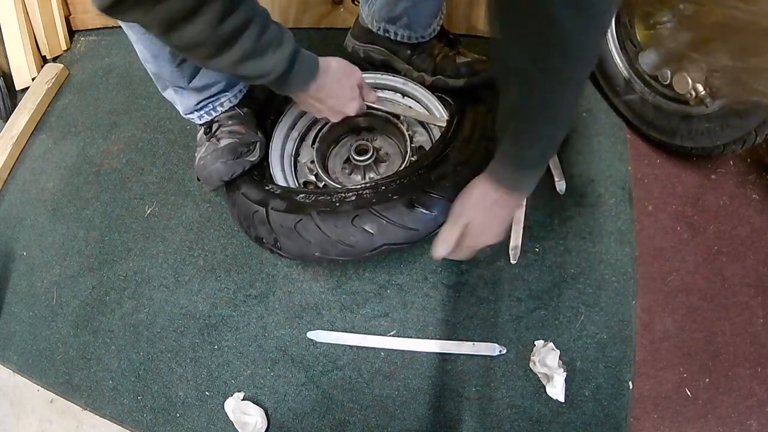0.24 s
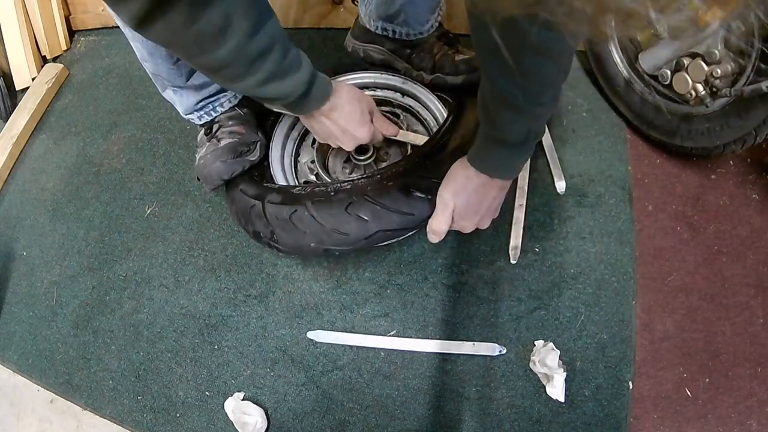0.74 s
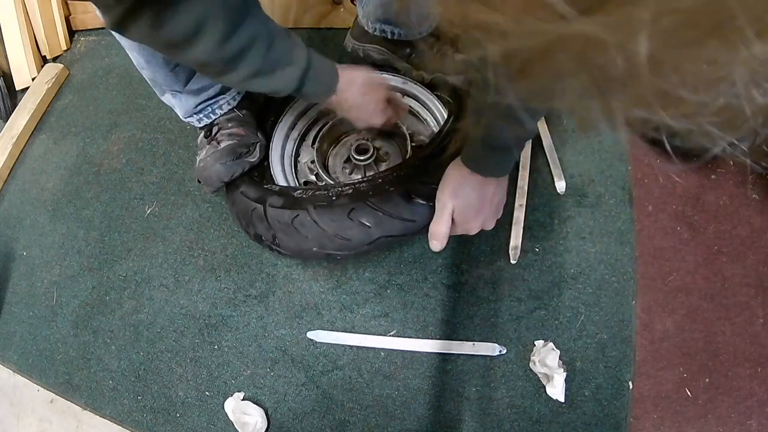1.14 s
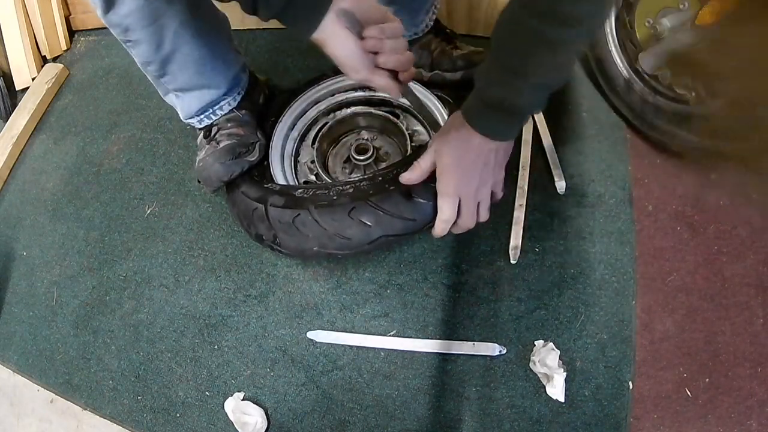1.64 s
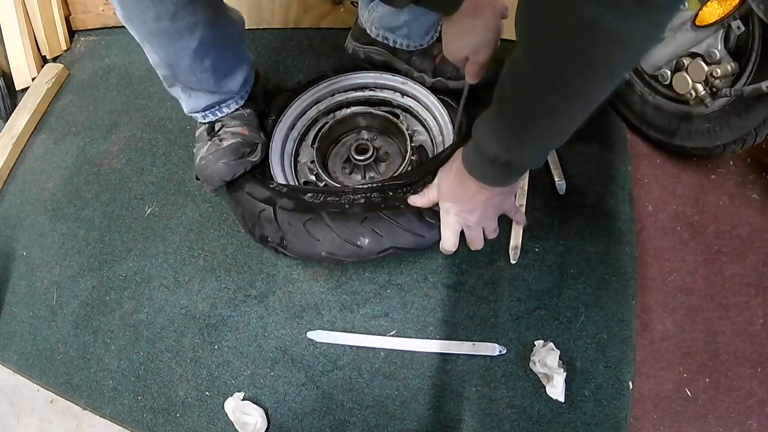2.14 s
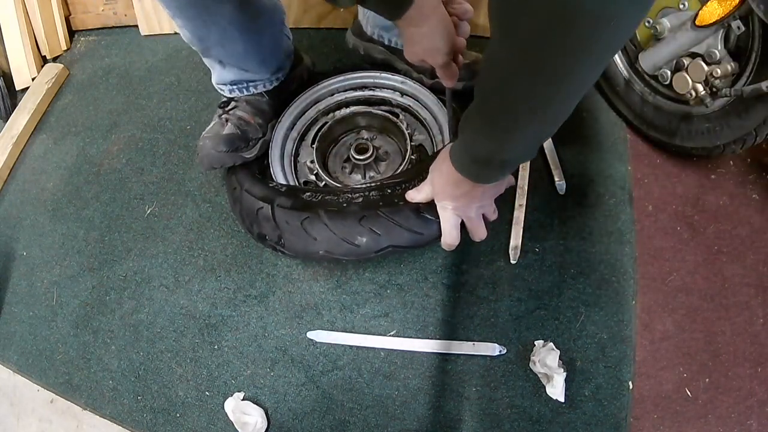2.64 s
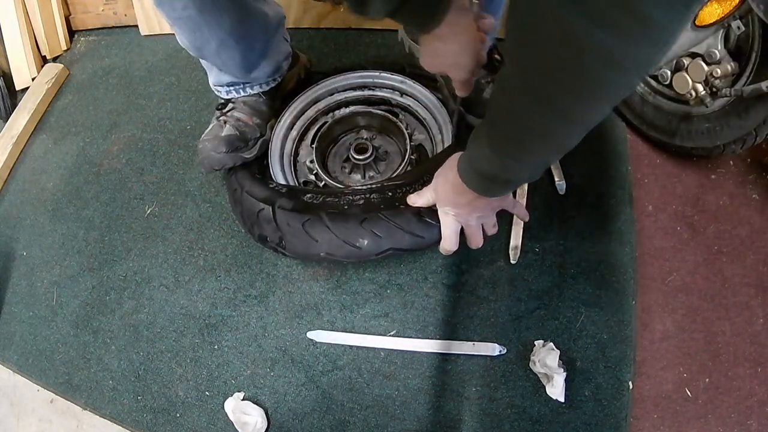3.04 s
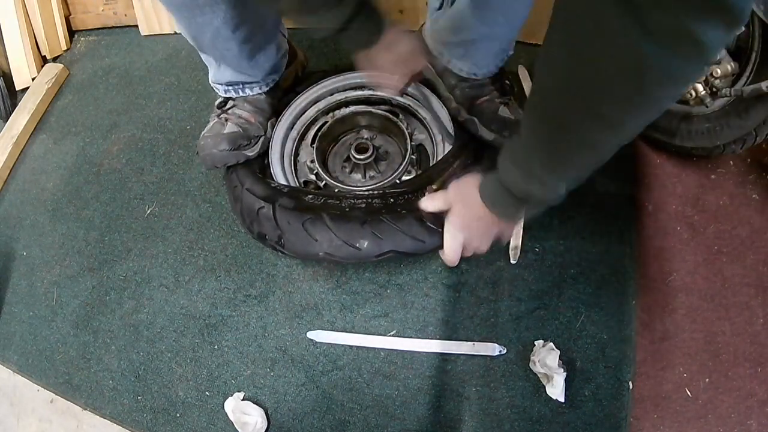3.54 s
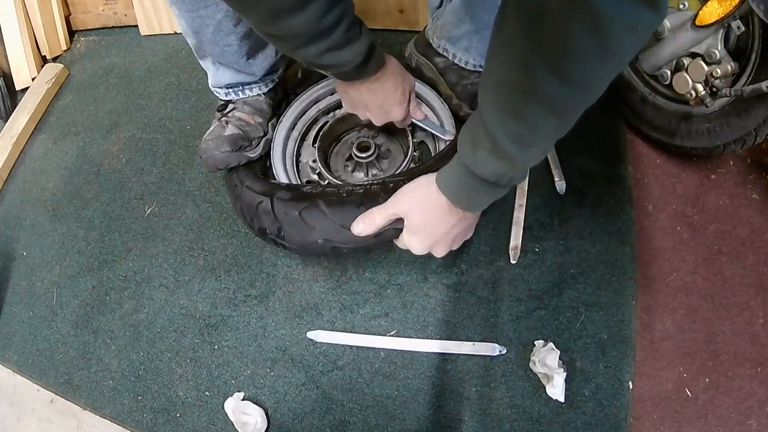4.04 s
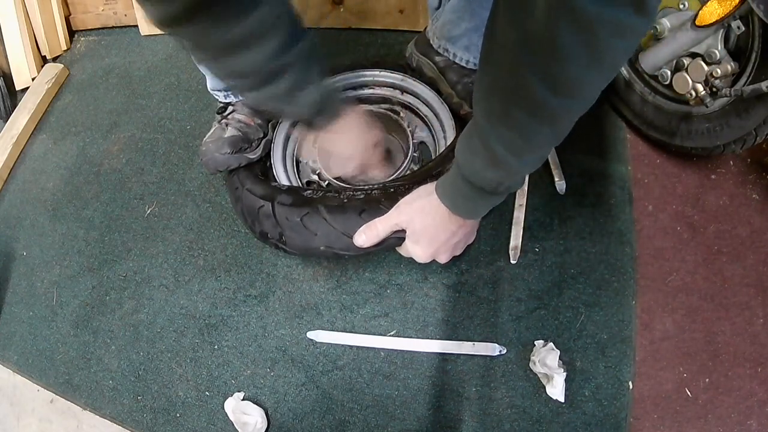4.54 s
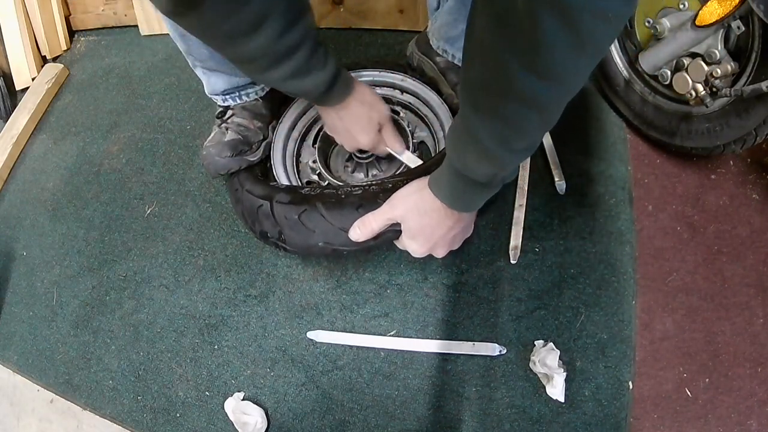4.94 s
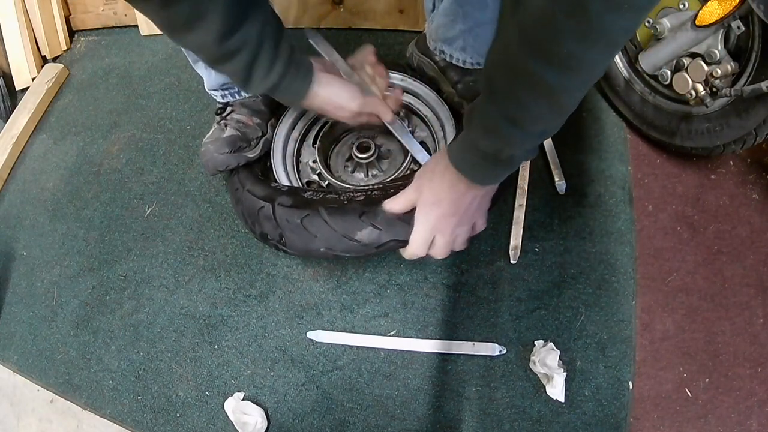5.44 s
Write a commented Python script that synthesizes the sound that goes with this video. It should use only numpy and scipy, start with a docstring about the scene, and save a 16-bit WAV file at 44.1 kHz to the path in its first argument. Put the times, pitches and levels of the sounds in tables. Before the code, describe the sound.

In a small carpeted room, close to a camera microphone, one tire iron drops against another with a bright ring, then a hard clank hits the wheel rim. Softer knocks, rubber thuds and gritty scrapes follow, with a short creak midway. A loud double clank comes late, then a few lighter taps, all over steady hiss.

```python
"""Over steady hiss a faint scrape and two small knocks come first, then one tyre iron is laid against another.
Both irons ring; knocks on a steel wheel, tyre thuds, scrapes and one creak of rubber follow, in a small
carpeted room, close to a camera microphone. Irons, rim and bead are sums of dying sines, thuds are damped
tones, knocks and scrapes are shaped noise; a sparse random echo tail makes the room."""
import sys
import numpy as np
from scipy import signal
from scipy.fft import rfft, irfft
from scipy.io import wavfile
from scipy.ndimage import uniform_filter1d

SR = 44100
rng = np.random.default_rng(int(sys.argv[2]) if len(sys.argv) > 2 else 0)


def transcribe(u):
    """Save the signal u as a 16-bit wav file named by the first command-line argument.

    u: samples, shape (n,) or (channels, n), limited to [-1, 1]; the rate is SR.
    q: integer samples, one column per channel.
    """
    v = np.clip(np.atleast_2d(u).T, -1, 1)
    q = np.round(v * 32767).astype(np.int16)
    wavfile.write(sys.argv[1], SR, q)


N = 250929  # length in samples

# modes of the steel rim held by the tyre, close pairs warble: f/Hz, level/dB, t60/s
RIM_MODES = [(1424, 5, .055), (1462, -1, .05), (1885, -14, .04), (2120, -16, .05), (2310, -8, .11),
             (2485, -10, .08), (2700, -15, .07), (2860, -16, .08), (3480, -5, .035), (3770, -10, .05),
             (4600, -7, .03), (4850, -11, .03)]
# colour of the damped crunch of iron on rim and rubber: f/Hz, relative level/dB
CRUNCH_COLOUR = [(250, -32.5), (700, -6.5), (1100, -6), (1430, -6.5), (1800, -3.5), (2200, -2.5),
                 (2900, -5.5), (3500, -5.5), (4100, -6.5), (4700, -10), (5600, -22.5), (8000, -24.5),
                 (12000, -33)]
# rubber bead slipping on the rim: t/s, slip rate f/Hz, level/dB
BEAD_SLIPS = [(3.09, 264, -21), (3.11, 254, -26.5), (3.125, 240, -21.5), (3.137, 200, -25),
              (3.144, 275, -29.5)]


def gain_of(db):
    """Decibels to gain."""
    return 10 ** (np.asarray(db) / 20)


def evened(x):
    """Scales to rms 1."""
    return x / np.sqrt(np.mean(x ** 2) + 1e-20)


def read(points, hz):
    """Reads a spectrum table on a log-frequency axis."""
    f, value = np.transpose(points)
    return np.interp(np.log(hz + 1), np.log(f + 1), value)


def add(mix, s, sound):
    """Mixes a sound in at a time in seconds."""
    part = mix[round(s * SR):][:len(sound)]
    part += sound[:len(part)]


def high_pass(x, order, hz):
    """Takes away the bass below hz."""
    return signal.sosfilt(signal.butter(order, hz, "high", fs=SR, output="sos"), x)


def shaped(x, points):
    """Gives noise the colour of a spectrum table, rms 1."""
    hz = np.fft.rfftfreq(len(x), 1 / SR)
    return evened(irfft(rfft(x) * gain_of(read(points, hz)), len(x)))


def ring(modes, seconds, tilt_db=0, spread_db=0, rise_ms=0.15):
    """One blow on a body: dying sines, tilted about 2 kHz, each excited more or less by where the blow lands."""
    hz, db, t60 = np.transpose(modes)[:, :, None]
    t = np.arange(round(seconds * SR)) / SR
    db = db + tilt_db * np.log2(hz / 2000) + spread_db * rng.standard_normal(hz.shape)
    sound = (gain_of(db - 60 * t / t60) * np.sin(2 * np.pi * hz * t)).sum(0)
    rise = np.sin(np.pi / 2 * np.minimum(1000 * t / rise_ms, 1)) ** 2
    return sound * rise


def resonate(x, hz, width_hz):
    """A resonance of gain 1 at its centre: shifts hz down to zero, smooths, and shifts back."""
    turn = np.exp(2j * np.pi * np.cumsum(hz * np.ones(len(x))) / SR)
    r = np.exp(-np.pi * width_hz / SR)
    return 2 * (turn * signal.lfilter([1 - r], [1, -r], x / turn)).real


def hiss():
    """Steady background hiss: coloured noise at a constant level."""
    # spectrum of the hiss: f/Hz, relative level/dB
    hiss_colour = [(15, -32), (25, -11), (59, -12.5), (78, -4.5), (173, -5.5), (322, -7.5), (474, -2),
                   (540, -7.5), (859, -5.5), (928, -3.5), (1480, -4), (12000, -11.5), (15500, -41),
                   (22000, -120)]
    return gain_of(-58) * shaped(rng.standard_normal(N), hiss_colour)


def shuffle():
    """Sleeves, shoes and rubber rustle faintly in small clumps: noise with an uneven level."""
    # faint handling between the blows: t/s, level/dB
    handling = [(0.0, -59.5), (0.43, -57), (0.65, -60.5), (0.86, -63), (3.45, -60.5), (4.23, -65),
                (5.69, -56.5)]
    # spectrum of the rustle: f/Hz, relative level/dB
    rustle_colour = [(60, -25), (200, -7.5), (500, -3.5), (1500, -6.5), (4000, -9), (12000, -23)]
    s, level_db = np.transpose(handling)
    clumps = evened(uniform_filter1d(uniform_filter1d(rng.standard_normal(N), 500), 500))
    level_db = np.interp(np.arange(N) / SR, s, level_db) + 1.8 * clumps
    return gain_of(level_db) * shaped(rng.standard_normal(N), rustle_colour)


def room(x):
    """Sparse taps of random sign, one in every 20 samples, each band dying at its own speed."""
    # decay of the room: f/Hz, t60/s
    decay = [(300, 0.59), (800, 0.2), (3000, 0.2), (10000, 0.17)]
    taps = np.zeros(SR // 2)
    at = np.arange(300, len(taps) - 20, 20)
    taps[at + rng.integers(0, 20, len(at))] = rng.choice([-1., 1.], len(at))
    hz, t, bands = signal.stft(taps, SR, nperseg=256)
    bands = bands * gain_of(-60 * t / read(decay, hz)[:, None])
    tail = signal.istft(bands, SR, nperseg=256)[1]
    return signal.fftconvolve(x, tail / np.linalg.norm(tail))[:N]


def creak():
    """Stick and slip: a quick train of slips that slows, then quickens at the very end; each rings the bead."""
    # what each slip rings: f/Hz, level/dB, t60/s
    bead_modes = [(740, 5, 0.0053), (1350, -8, 0.0065), (3230, 9.5, 0.005), (3620, -9, 0.0047),
                  (4510, -2, 0.0062), (6750, -19, 0.0069)]
    s, rate, level_db = np.transpose(BEAD_SLIPS)
    t = np.arange(s[0], s[-1], 1 / SR)
    # a slip falls wherever the running count passes a whole number
    slips = np.diff(np.floor(np.cumsum(np.interp(t, s, rate)) / SR), prepend=0)
    slips *= gain_of(np.interp(t, s, level_db) + rng.standard_normal(len(t)))
    return signal.fftconvolve(slips, ring(bead_modes, .03, rise_ms=1.0))  # rubber lets go gradually


def scrape(seconds, level_db, hz, width_hz, body_db):
    """Gritty friction passes a bright resonance, the crunch and modes of the rim and the low body of the tyre."""
    size = round(seconds * SR)
    roughness = evened(uniform_filter1d(rng.standard_normal(size), 90))
    grit = rng.standard_normal(size) * gain_of(3.5 * roughness)
    bright = evened(resonate(resonate(grit, hz, width_hz), hz, 2 * width_hz))
    bright += width_hz / 3500 * shaped(grit, CRUNCH_COLOUR)  # broad scrapes crunch more
    bright += 0.087 * evened(signal.fftconvolve(grit, ring(RIM_MODES, 0.013, tilt_db=-9.5)))[:size]
    low = evened(resonate(resonate(grit, 1200, 1600), 1100, 1810))
    u = np.linspace(0, 1, size)
    stroke = np.sin(np.pi * u ** 0.6) ** 2  # swells sooner than it fades
    return gain_of(level_db) * (evened(bright) + gain_of(body_db) * low) * stroke


def thud(level_db, hz, fall_ms):
    """The tyre's rubber answers with a few cycles of a low damped tone."""
    ms = 1000 * np.arange(SR // 10) / SR
    cycles = ms * hz / 1000
    envelope = np.exp(-ms / max(fall_ms, .5)) * np.minimum(cycles * 3, 1)
    return gain_of(level_db) * np.sin(2 * np.pi * cycles) * envelope


def irons():
    """Three quick contacts ring both bars, the later two starting more gradually; the carpet then stills one bar."""
    # contacts of iron on iron: t/s, level/dB, brightness/(dB per octave), rise/ms
    clinks = [(0.107, -11, 0.2, 0.45), (0.116, -9.5, 2, 3.7), (.125, -3.5, 1.5, 3.4)]
    # modes of the iron that is put down: f/Hz
    laid_hz = [1001, 1357, 1916, 3182, 3580, 4511, 4619, 4694, 4770, 6019, 6060, 6352, 6476, 8317, 8506,
               9205, 9238, 10790, 11900, 1040, 1310, 1865, 1965]
    # how those modes ring: level/dB, t60/s
    laid_ring = [(-38, 8.3), (-42.5, 0.92), (-26.5, 0.25), (-12.5, 0.54), (-23.5, 0.42), (-34, 0.085),
                 (-14.5, 0.3), (-6, 0.27), (-27, 0.095), (-32, 0.527), (-36.5, 0.47), (-22, 0.25),
                 (-6.5, 0.17), (-15, 0.13), (-32, 0.57), (-21, 0.27), (-30, 0.21), (-34, 0.28),
                 (-39, 0.057), (-31.5, 0.29), (-32, 0.13), (-40.5, 0.111), (-47, 1.4)]
    # modes of the iron that is struck and rings on freely: f/Hz
    free_hz = [3004, 3639, 6831, 9835]
    # how those modes ring: level/dB, t60/s
    free_ring = [(-37, 1.4), (-43.5, 3.2), (-40, 1.1), (-40.5, 1.58)]
    settles_s, settled_t60_s = 0.368, 0.19  # the laid iron meets the carpet, and the extra decay from then
    t, bars = np.arange(N) / SR, np.zeros(N)
    settled = gain_of(-60 * np.maximum(t - settles_s, 0) / settled_t60_s)
    # the ring of the laid bar flutters unevenly
    flutter = evened(resonate(rng.standard_normal(N), 36, 21))
    low_pass = signal.butter(4, 2400, fs=SR, output="sos")
    next_contacts = [row[0] for row in clinks[1:]] + [t[-1]]
    for (s, db, tilt_db, rise_ms), until in zip(clinks, next_contacts):
        laid, free = np.zeros(N), np.zeros(N)
        add(laid, s, ring(np.c_[laid_hz, laid_ring], .6, tilt_db, rise_ms=rise_ms))
        add(free, s, ring(np.c_[free_hz, free_ring], 2.2, tilt_db, rise_ms=rise_ms))
        low = signal.sosfiltfilt(low_pass, laid)
        laid = (laid - low) * gain_of(1.1 * flutter) + low * gain_of(2.0 * flutter)
        handover = np.clip(1 - (t - until) / 0.0045, 0, 1)  # each contact takes over from the last
        bars += gain_of(db) * (laid * settled + free) * handover
    grind = rng.standard_normal(3000) * np.exp(-np.arange(3000) / 450)  # the bars grate as they meet
    add(bars, clinks[0][0], gain_of(-26.5) * resonate(grind, 5900, 7400))
    return high_pass(bars, 2, 900)  # thin bars radiate no bass


def knock(level_db, hard_db, ring_db):
    """A few ms of chattering contact between iron and rim crunch and ring the rim."""
    size = 8192
    chatter_ms = max(3.68 - 0.1 * hard_db, .5)  # softer blows chatter longer
    u = 1000 * np.arange(size) / SR / chatter_ms
    contact = rng.standard_normal(size) * (1 - np.exp(-2.5 * u)) * np.exp(-u)
    hz = np.fft.rfftfreq(size, 1 / SR)
    # soft blows lose treble all the way up, hard ones gain it only to 5 kHz
    octaves = np.log2((hz if hard_db < 0 else np.minimum(hz, 5000)) / 2000 + 0.041)
    colour = gain_of(read(CRUNCH_COLOUR, hz) + hard_db * octaves)
    crunch = irfft(rfft(contact) * colour, size)
    rim = ring(RIM_MODES, size / SR, hard_db, spread_db=1.0, rise_ms=1.02 * chatter_ms)
    blow = evened(crunch) + gain_of(ring_db) * evened(rim)
    fade = np.cos(np.linspace(0, np.pi / 2, size)) ** 2
    fade *= np.minimum(np.arange(size) / 16, 1)  # no click at the start
    return gain_of(level_db) * blow / abs(blow).max() * fade


def scene():
    """Scrapes, thuds, knocks, irons and creak near the microphone, with room tail, rustle and hiss."""
    # rubbing of iron, hand and rubber:
    # t/s, length/s, level/dB, centre f/Hz, width f/Hz, low body against the bright part level/dB
    scrapes = [(0.008, 0.064, -52, 2210, 1500, 2.5), (1.471, 0.15, -46, 3540, 1130, -14),
               (1.587, 0.33, -53.5, 4110, 804, -30), (1.71, 0.042, -47.5, 3970, 1200, -5.5),
               (1.745, 0.075, -51, 4330, 550, -29.5), (2.191, 0.052, -32, 2980, 1580, -10.5),
               (2.225, 0.11, -48, 2780, 1500, -2.5), (2.346, 0.048, -51.5, 3230, 1300, 1),
               (3.063, 0.17, -51.5, 3180, 1300, 6.5), (3.198, 0.066, -53, 2570, 1500, 8.5),
               (3.388, 0.13, -62, 2230, 1300, 10.5), (3.454, 0.18, -71.5, 2200, 1300, 12.5),
               (4.494, 0.13, -37, 3100, 2030, 2), (4.572, 0.19, -49, 2600, 2200, -5)]
    # the tyre thuds: t/s, level/dB, f/Hz, time to fall to about a third/ms
    thuds = [(0.4240, -31.5, 206, 11.3), (0.4297, -22.5, 472, 6.7), (0.4682, -36, 686, 4.9),
             (0.5825, -24, 497, 7.2), (0.6996, -39, 475, 5.7), (0.8121, -32, 730, 4.5),
             (1.944, -39.5, 470, 6.1), (2.3311, -22.5, 272, 5.5), (2.365, -29, 202, 3.4),
             (2.9002, -28, 290, 2.5), (2.904, -29, 470, 6.7), (3.2245, -19, 242, 2),
             (3.4516, -14.5, 612, 1.85), (3.7283, -43.5, 214, 5.4), (4.5161, -36.5, 662, 2.8),
             (4.5235, -18.5, 406, 4.8), (4.5407, -17, 560, 1.5), (4.5449, -17, 434, 11),
             (4.5643, -19.5, 452, 4.7), (4.9676, -36.5, 449, 7.7), (5.144, -33.5, 422, 7.9),
             (5.3011, -42.5, 432, 14)]
    # iron knocks on the rim: t/s, level/dB, hardness/(dB per octave), rim ring against the crunch level/dB
    knocks = [(0.0295, -29, -5.5, -13), (0.039, -26.5, -5, -25), (0.4304, -16.5, -2, -3),
              (0.4534, -16.5, -0.5, -12), (0.468, 1.5, 1, -0.5), (0.4754, -8, 3.5, 4),
              (0.5825, -32, 0.5, 1), (0.803, -34, -2.5, -12), (0.8123, -17, -1.4, 1.5),
              (1.1485, -36, -5.5, -6), (1.2, -33, 6.5, -23), (1.718, -39.5, -3.5, 18),
              (2.3307, -30, -10.5, -13), (2.378, -30, -1, -20), (2.9002, -29.5, -4.5, -8),
              (2.9065, -39, 5, -8), (3.4517, -21.5, -10, -9), (3.4552, -27, -13.5, -11),
              (4.3811, -41, -7.5, -13), (4.5163, -19.5, -2, -12), (4.5234, -23, 14, -16),
              (4.541, -0.5, -2, 2.5), (4.545, 3, 2, -1), (4.5648, -10.5, -3.5, -19),
              (4.583, -27, -8.5, -20), (5.144, -15.5, 0.5, 5), (5.3014, -32.5, -10.5, -4.5)]
    work, tyre = np.zeros((2, N))
    for s, *stroke in scrapes:
        add(work, s, scrape(*stroke))
    for s, *bump in thuds:
        add(tyre, s, thud(*bump))
    for s, *blow in knocks:
        add(work, s, knock(*blow))
    bars = irons()
    sent = high_pass(work + 0.19 * bars + 0.34 * tyre, 1, 450)  # carpeted room, thin bass tail
    near = work + tyre + bars + gain_of(-12.5) * room(sent)
    add(near, BEAD_SLIPS[0][0], creak())  # muffled by the tyre, too small to wake the room
    near = high_pass(near, 4, 125)  # the small microphone hears little bass
    return (near + shuffle() + hiss())[None]


def record(dry):
    """Camera microphone: a dip from its housing, overload clipping on the hardest blows, a band limit."""
    notch_hz, notch_width_hz, notch_db = 8715, 476, -10.5
    edge_hz = 12150
    hz = np.fft.rfftfreq(N, 1 / SR)
    dip = gain_of(notch_db * np.exp(-((hz - notch_hz) / notch_width_hz) ** 2))
    loud = np.clip(irfft(rfft(dry) * dip, N), -1, 1)
    band_limit = signal.firwin(511, edge_hz, window=("kaiser", 9), fs=SR)
    return signal.oaconvolve(loud, band_limit[None], "same")


dry = scene()
out = record(dry)
transcribe(out)
```